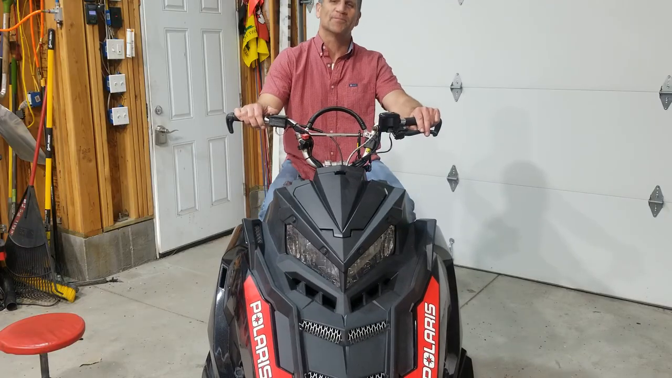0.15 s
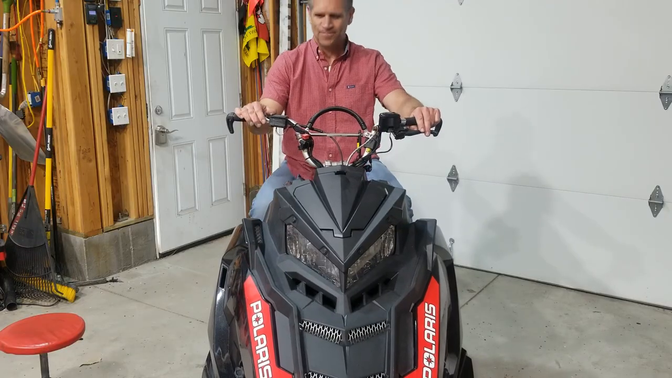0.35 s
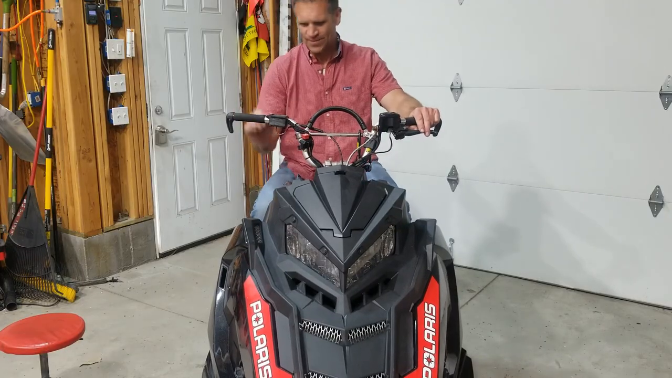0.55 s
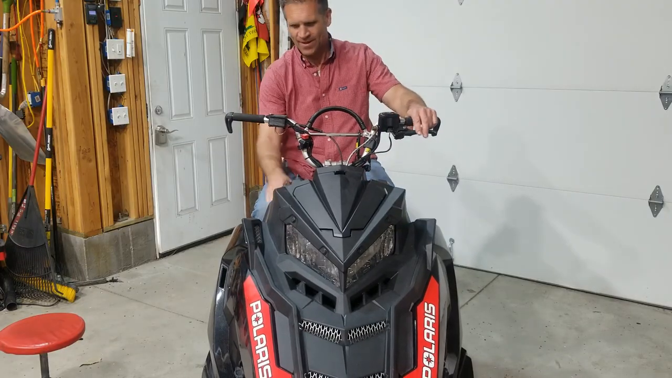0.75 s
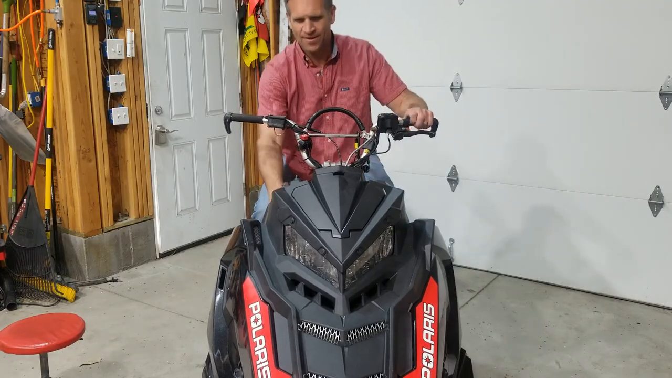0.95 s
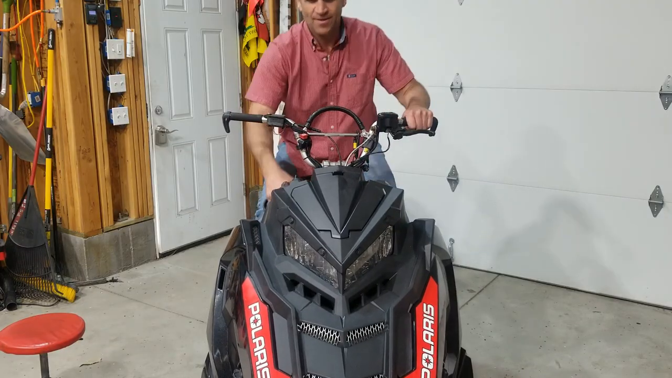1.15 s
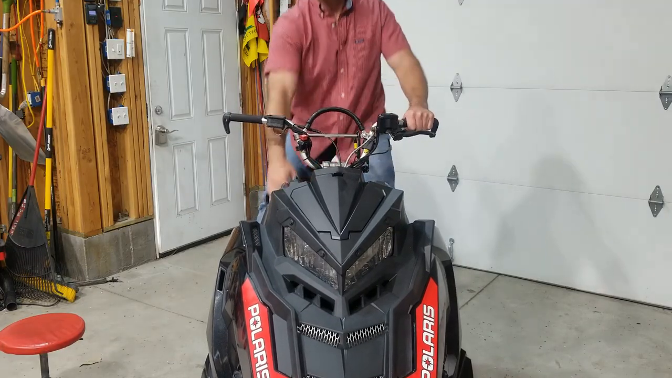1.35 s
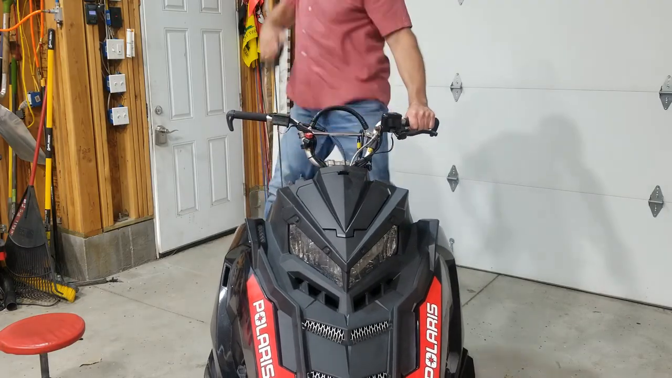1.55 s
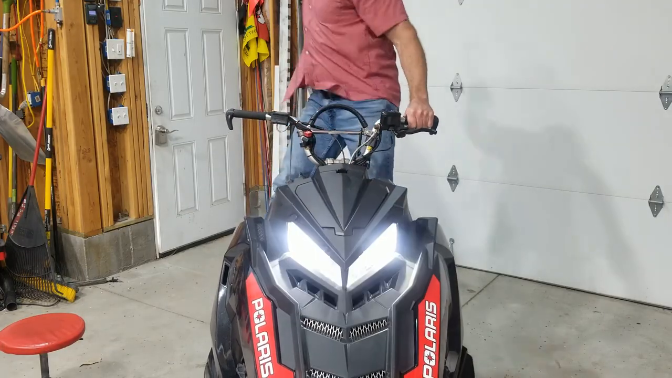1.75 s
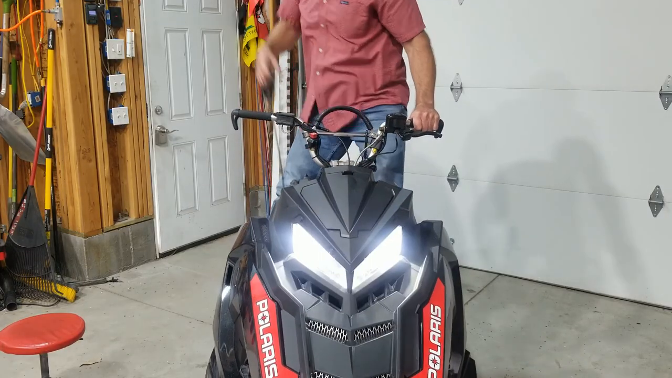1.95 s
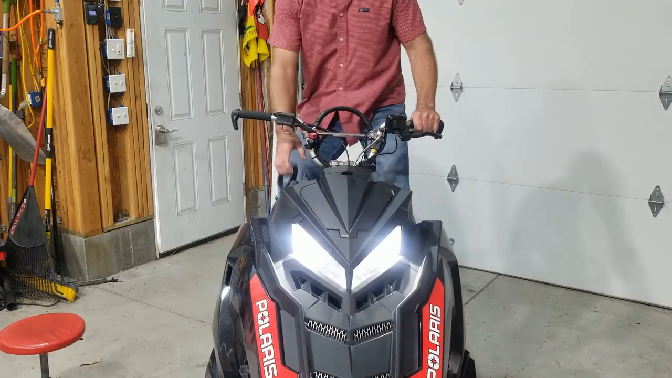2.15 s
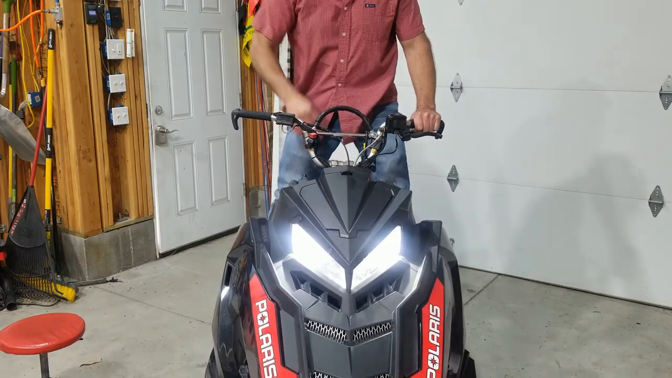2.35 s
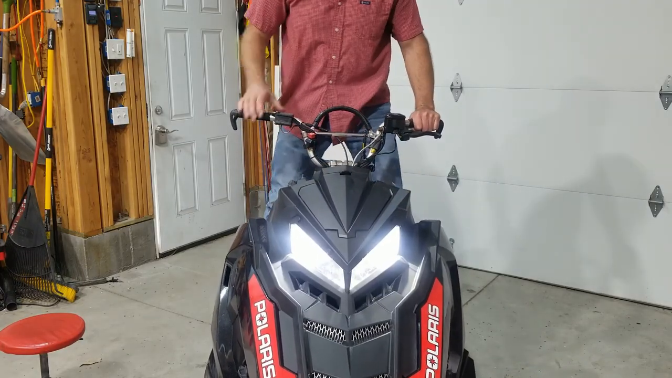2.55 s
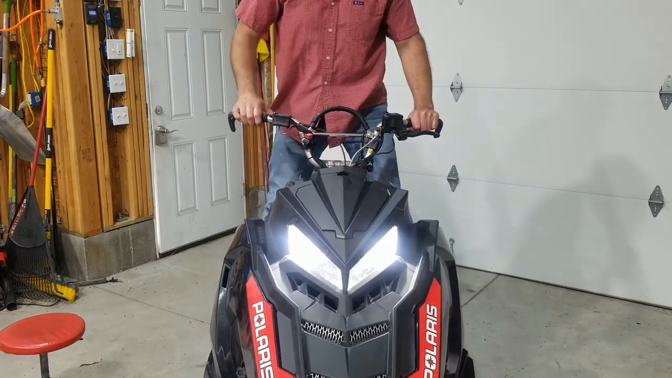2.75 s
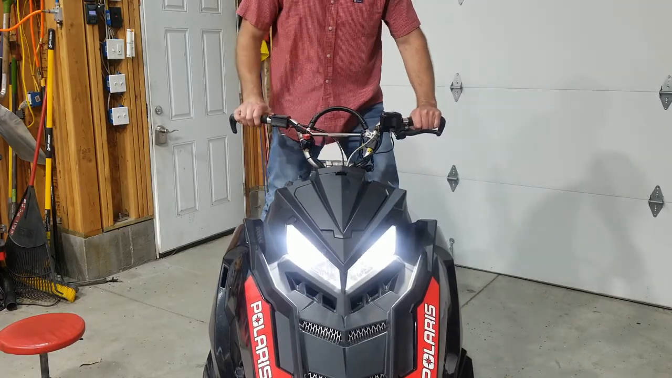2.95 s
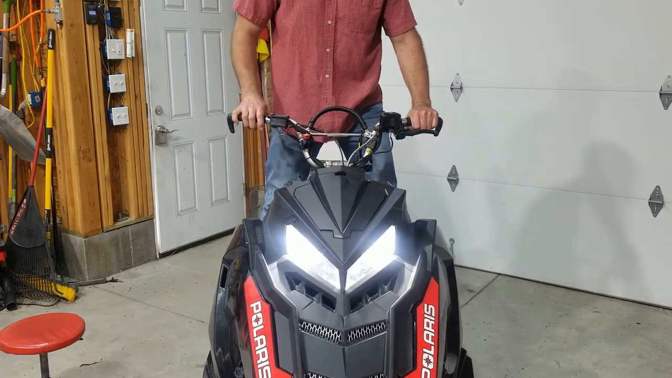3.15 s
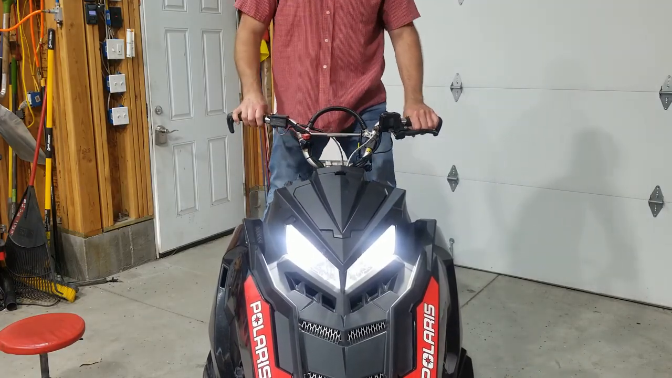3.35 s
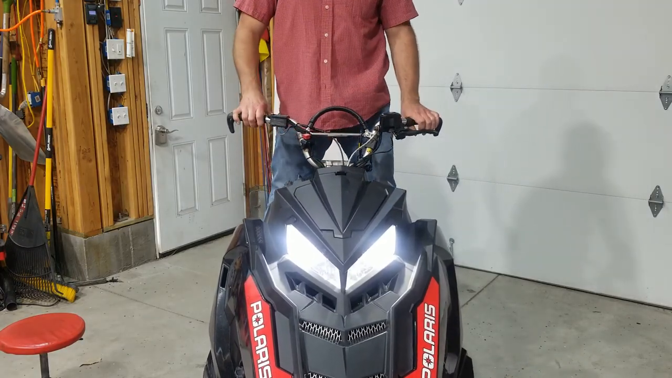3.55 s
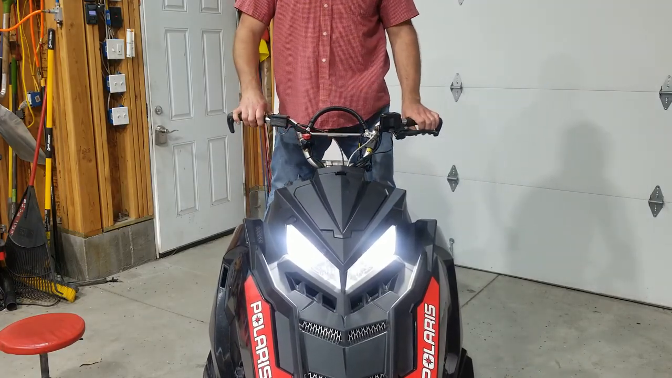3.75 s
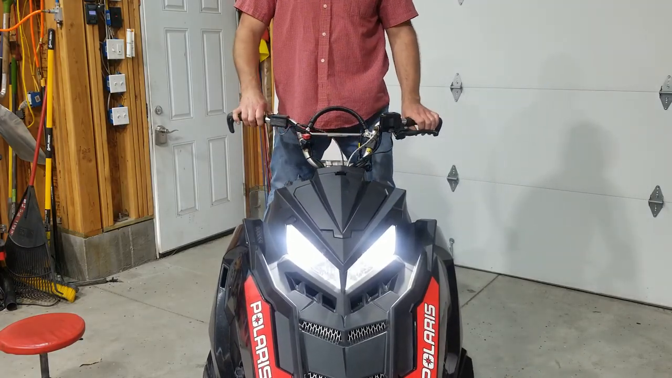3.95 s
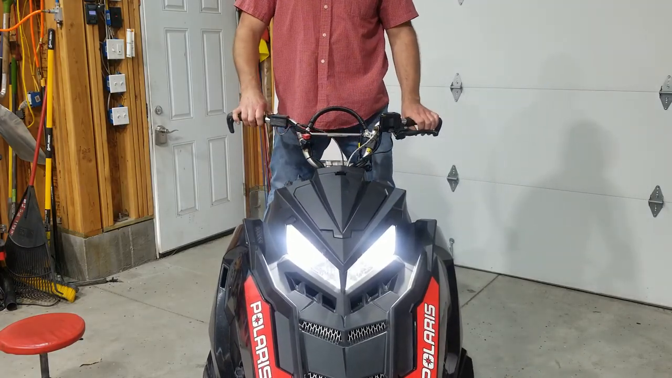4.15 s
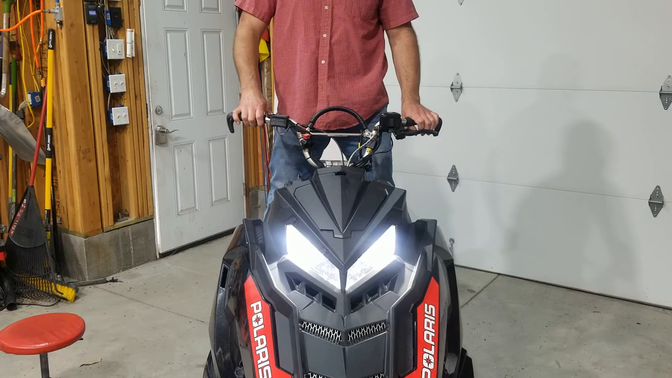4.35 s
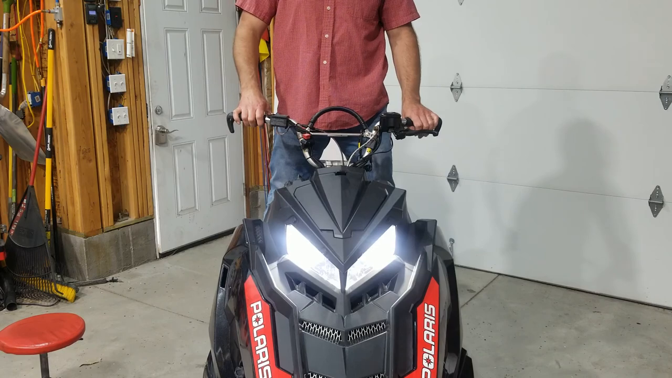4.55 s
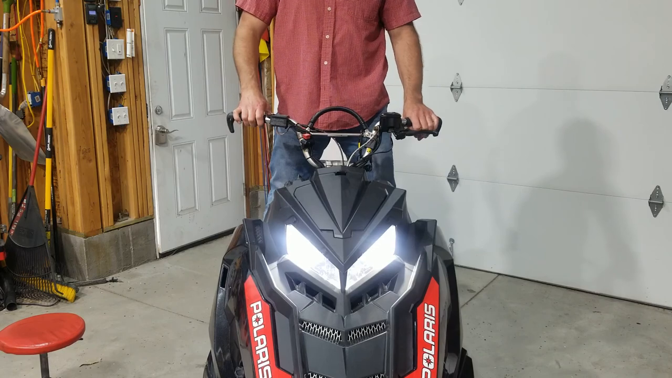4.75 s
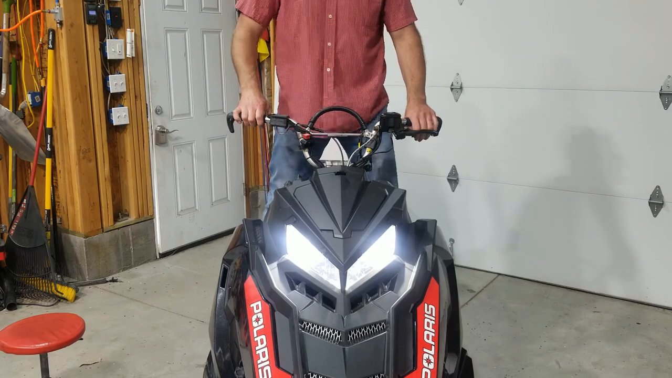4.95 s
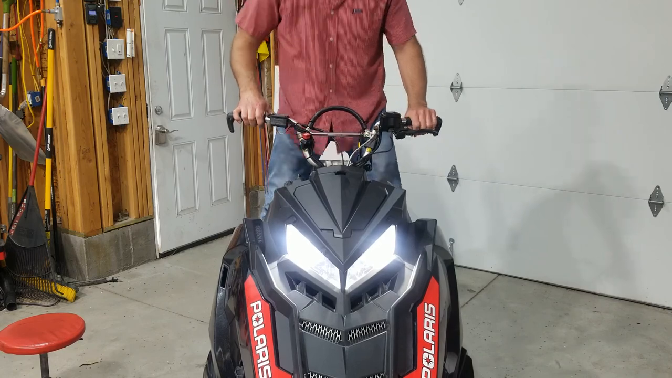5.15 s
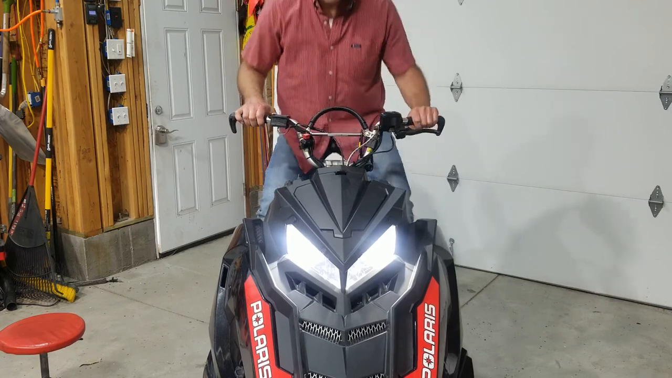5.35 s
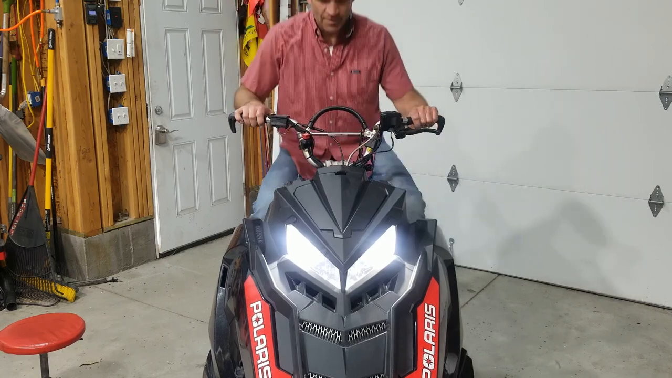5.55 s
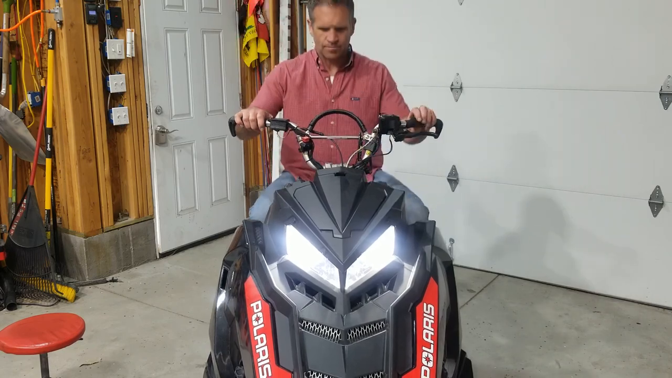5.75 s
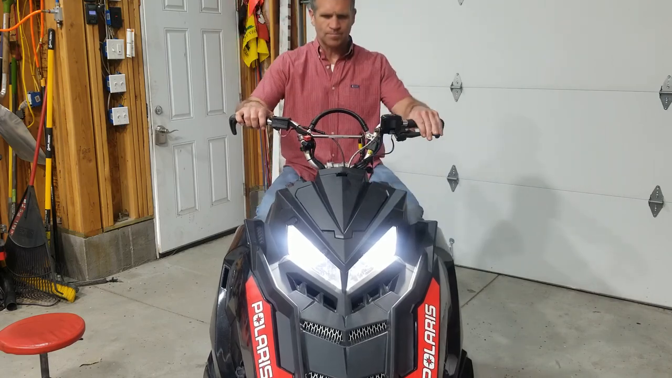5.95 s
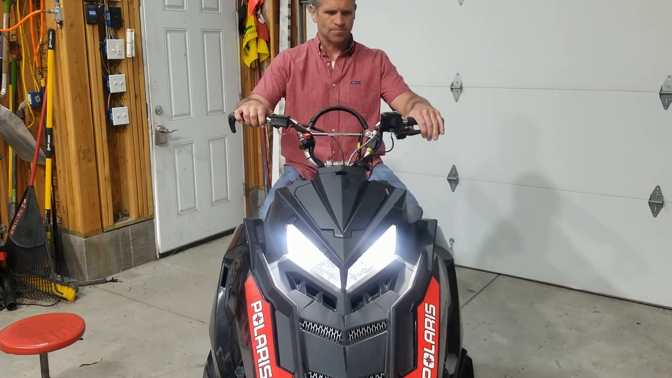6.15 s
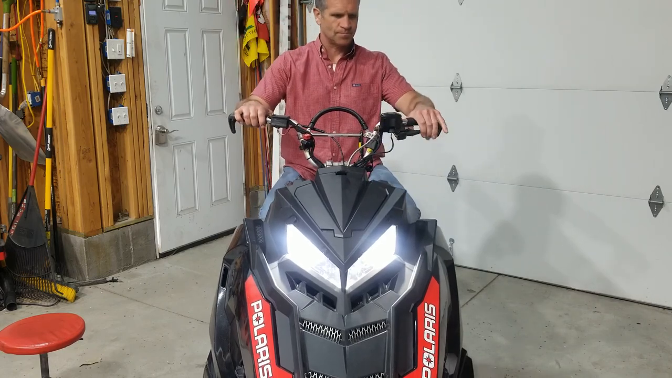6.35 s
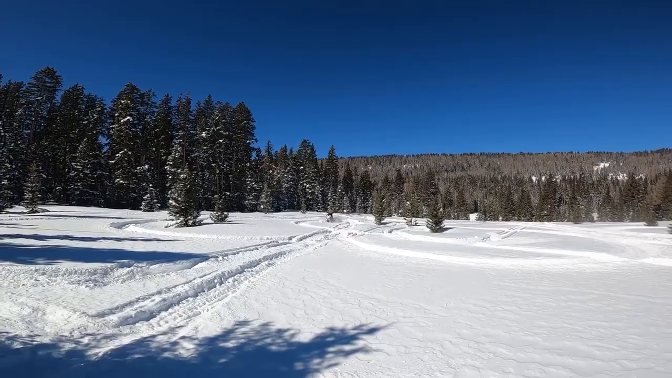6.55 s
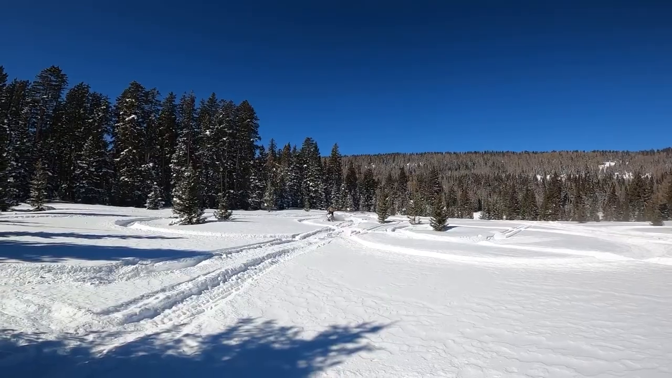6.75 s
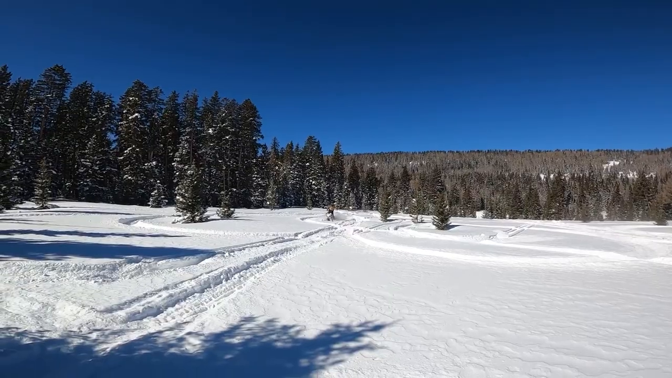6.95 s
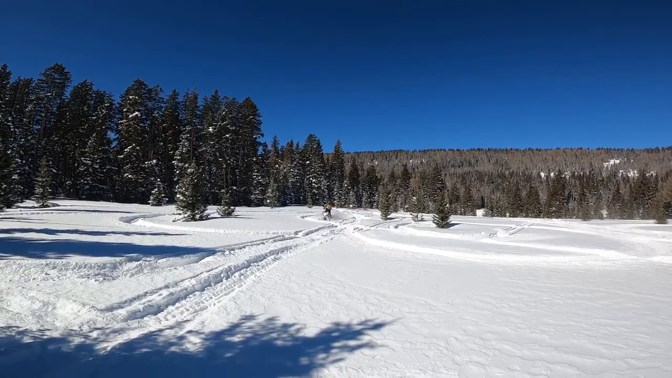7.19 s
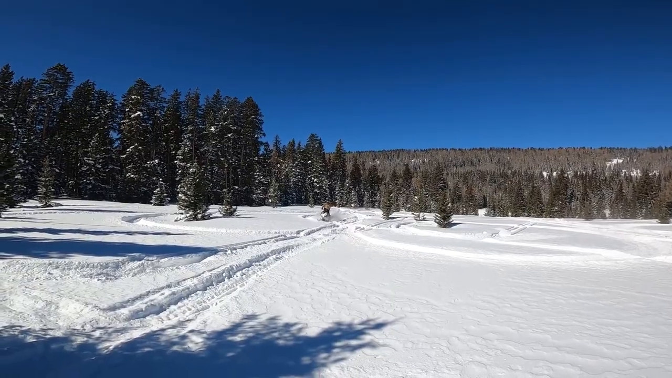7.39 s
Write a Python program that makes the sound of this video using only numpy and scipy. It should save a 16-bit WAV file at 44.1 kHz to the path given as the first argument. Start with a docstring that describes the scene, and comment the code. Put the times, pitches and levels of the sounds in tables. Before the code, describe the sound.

For the first 1.4 seconds, a faint low hum fills a closed garage while a rider shifts on a snowmobile: soft seat thuds, cloth scrapes and hollow knocks on the bodywork, ending in a pull of the starter cord. The two-stroke engine catches with a low thump near 1.5 seconds as the sound fades to brief silence. From about 1.7 seconds it fades back in, growing steadily louder on an uneven, close idle. Each irregular firing rings the exhaust pipe, rattles the panels and puffs hiss, over a deep boom that overloads the microphone. Around 5 seconds the engine briefly surges and fires evenly, then returns to sputtering. At 6.5 seconds it cuts off abruptly, replaced by a much quieter snowmobile at full speed far across an open snowfield, a wavering whine over a rushing roar, lasting until about 7.4 seconds.

```python
"""Closed garage, low hum: a rider shifts on a two-stroke snowmobile, knocks the bodywork, pulls the cord.
The engine catches near 1.5 s, during a fade out. From 1.7 s a long fade in on an uneven idle: each
firing rings the pipe, rattles panels and puffs hiss, most swell the silencer boom, and the bass overloads
the microphone. Near 5 s, a brief surge of even firing. At 6.5 s a hard cut to a snowfield:
a far sled at full speed, wavering crank orders over track and intake roar."""
import sys
import numpy as np
from scipy import signal
from scipy.io import wavfile
from scipy.ndimage import uniform_filter1d

SR = 44100
rng = np.random.default_rng(int(sys.argv[2]) if len(sys.argv) > 2 else 0)


def master_out(mix):
    """Clip the mix to full scale and print it as 16-bit PCM to the path in sys.argv[1]."""
    frames = np.transpose(np.atleast_2d(mix))
    ceiling = np.clip(frames, -1, 1)
    pcm = np.round(ceiling * 32767).astype(np.int16)
    wavfile.write(sys.argv[1], SR, pcm)


N = 327310
T = np.arange(N) / SR

# (frequency [Hz], L/R correlation [-])
GARAGE_COHERENCE = [(60, 0.97), (180, 0.85), (550, 0.63), (1650, 0.23), (4970, -0.16), (15000, 0.018)]
# stereo balance: (frequency [Hz], L-R [dB])
RIDER_BALANCE = [(60, -9), (180, -5), (550, -8), (1650, -8.5), (4970, 0), (15000, 19)]
ENGINE_BALANCE = [(60, -12), (130, -4.5), (290, -7), (640, -7.5), (1410, -5.5), (3100, -1), (6820, 5.5),
                  (15000, 13.5)]
# cloth, cord and exhaust hiss: (frequency [Hz], density [dB])
HISS_SPECTRUM = [(2060, -33), (3500, 5), (4340, 7), (6540, -2.5), (7010, 0.5), (10500, 1.5), (12900, 2),
                 (13500, -0.5), (15800, -8.5)]
# engine audible: (start [s], end [s])
ENGINE_SPANS = [(1.38, 1.69), (1.727, 6.495)]
# (time [s], bang [dB], favoured pipe pitch [Hz], silencer boom [dB]; nan = last swell carries on)
IDLE_FIRINGS = [(1.385, -73, 307, -34), (1.439, -70, 307, -38), (1.468, -47, 307, -19),
                (1.504, -55, 306, -18.5), (1.54, -46.5, 306, -18), (1.594, -36, 300, np.nan),
                (1.721, -58, 251, -15), (1.784, -48.5, 251, -14), (1.86, -38, 263, -13.5),
                (1.919, -35, 267, -19), (2.005, -63, 250, -20), (2.062, -34.5, 250, -17.5),
                (2.12, -33.5, 265, -17), (2.223, -35, 342, -18.5), (2.348, -37, 220, -15.5),
                (2.443, -40, 258, -26), (2.497, -55, 254, -19.5), (2.542, -36.5, 263, -15.5),
                (2.598, -34.5, 319, -15), (2.692, -46, 263, -18.5), (2.775, -63, 260, -19),
                (2.812, -36.5, 258, -18.5), (2.86, -37, 264, np.nan), (2.885, -35.5, 222, -16.5),
                (3.025, -39.5, 260, -25.5), (3.113, -36, 270, -21), (3.204, -38.5, 249, -29),
                (3.271, -56.5, 244, -20), (3.308, -36, 250, -17.5), (3.377, -46, 254, -18.5),
                (3.415, -36, 262, np.nan), (3.507, -34.5, 280, -20), (3.609, -37, 267, -22.5),
                (3.658, -37.5, 277, -16), (3.748, -48, 341, -19), (3.798, -40, 338, -22.5),
                (3.856, -35.5, 251, -18), (3.952, -36, 262, -14), (4.014, -35, 275, -19),
                (4.094, -54, 320, -16.5), (4.118, -41, 316, np.nan), (4.18, -53.5, 316, -17),
                (4.226, -53.5, 316, -15), (4.273, -34, 358, -17), (4.402, -64, 264, -21),
                (4.431, -36.5, 264.8, -15), (4.485, -34, 272, -16), (4.618, -38.5, 250, -15),
                (4.672, -35.5, 263, -16.5), (4.771, -38.5, 258, -19.5), (4.829, -54.5, 231, -22),
                (4.871, -34, 232, -17), (4.891, -33.5, 274, np.nan), (4.921, -32.5, 311, -17.5),
                (4.948, -37.5, 300, -28.5), (5.099, -40, 209, -25), (5.14, -40, 214, -20.5),
                (5.201, -50, 211.9, -18.5), (5.256, -37.5, 262.4, -19), (5.295, -56, 252, -17.5),
                (5.373, -42, 263, np.nan), (5.462, -41.5, 305, -15.5), (5.558, -46, 225, -14),
                (5.601, -40, 256, -17), (5.661, -35.5, 297, -19.5), (5.786, -42, 260.8, -26),
                (5.836, -37.5, 207.8, -19), (5.936, -39, 222, -19.5), (6.018, -63, 306.3, -20),
                (6.115, -36, 309, -21.5), (6.144, -38, 315, -18), (6.258, -63, 319, -17),
                (6.33, -36.5, 306, -22), (6.358, -38, 309.2, -19), (6.52, -56, 317, -27)]
# steady noise under the firings: (time [s], rumble [dB], rattle [dB], hiss [dB])
ENGINE_FLOOR = [(1.38, -76, -42, -73), (1.46, -40, -30.5, -71), (1.5, -39, -31, -65), (1.69, -20, -18, -26),
                (1.73, -15, -23.5, -37), (2.04, -23, -29, -53), (2.2, -23, -28, -49), (4.8, -22, -29, -49),
                (5.0, -20.5, -24.5, -44), (5.7, -25, -29, -48.5), (6.5, -24.5, -29.5, -51.5)]

FULL_BANG_DB = -36
RING_DB, RING_SLOPE = -20.5, 0.55  # pipe and rumble drive at a full bang; dB per dB of bang


def gain_of(db):
    return 10 ** (np.asarray(db) / 20)


def unit_rms(x):
    return x / np.sqrt(np.mean(x ** 2) + 1e-20)


def at_hz(points, hz):
    f, value = np.transpose(points)
    return np.interp(np.log(hz + 1), np.log(f + 1), value)


def level(rows, column=1):
    """Gain along a dB curve, silent outside it."""
    rows = np.array(rows, float)
    return gain_of(np.interp(T, rows[:, 0], rows[:, column], left=-150, right=-150))


def add(mix, start_s, sound):
    part = mix[..., round(start_s * SR):][..., :sound.shape[-1]]
    part += sound[..., :part.shape[-1]]


def noise(spectrum, balance, patch_db, size=1024, coherence=GARAGE_COHERENCE):
    """Coloured stereo noise with drifting spectral patches; mid at unit RMS."""
    frames, hz = N // (size // 4) + 5, np.fft.rfftfreq(size, 1 / SR)
    a, b, c, d, patches = rng.standard_normal((frames, len(hz), 5)).T
    patches = unit_rms(uniform_filter1d(uniform_filter1d(patches, size=8, axis=0), size=8, axis=1))
    shared = np.clip(at_hz(coherence, hz), -1, 1)[:, None]
    left = a + 1j * b
    bins = np.array([left, shared * left + np.sqrt(1 - shared ** 2) * (c + 1j * d)])
    pan_db = np.outer([.5, -.5], at_hz(balance, hz))[..., None]
    bins *= gain_of(at_hz(spectrum, hz)[:, None] + patch_db * patches + pan_db)
    out = signal.istft(bins, nperseg=size, noverlap=size * 3 // 4)[1][:, :N]
    return out / np.sqrt(np.mean(out.mean(0) ** 2))


def ring(hz, db, t60_s, rise_s):
    """Decaying mode, soft onset, small L/R phase offset."""
    t = np.arange(round(SR * t60_s)) / SR
    start, shift = rng.random(2)
    phase = 2 * np.pi * (hz * t + start + np.array([[0], [0.064 * (shift - .5)]]))
    return gain_of(db - 60 * t / t60_s) * (1 - np.exp(-t / rise_s)) * np.sin(phase)


def firing_db(full_db, slope):
    """Level per firing: full_db at a full bang, slope in dB per dB."""
    return full_db + slope * (np.transpose(IDLE_FIRINGS)[1] - FULL_BANG_DB)


def bursts(db, rise_s, t60_s, floor=0):
    """Envelope: each firing adds power that dies in the room."""
    kicks = np.zeros(N)
    kicks[np.round(np.transpose(IDLE_FIRINGS)[0] * SR).astype(int)] = gain_of(2 * db)
    t = np.arange(SR // 2) / SR
    power = signal.oaconvolve(kicks, (1 - np.exp(-t / rise_s)) * gain_of(-120 * t / t60_s))[:N]
    return np.sqrt(abs(power) + floor ** 2)


def strokes(rows, column, rise_db_s, fall_db_s):
    """Envelope: a rise and fall around each peak; the loudest wins."""
    db = [row[column] - np.where(T < row[0], rise_db_s, fall_db_s) * abs(T - row[0]) for row in rows]
    return gain_of(np.max(db, axis=0))


def garage_air(hum_hz=92, width_hz=5):
    """Still air and a narrow low hum."""
    # (time [s], level [dB])
    hum_curve = [(0.0, -33), (.2, -46.5), (.652, -40), (1.088, -39.5), (1.178, -55), (1.33, -60)]
    # (frequency [Hz], density [dB])
    air_spectrum = [(12, -25), (25, -15), (90, 11.5), (200, 10), (300, 3), (420, -12.5), (1500, -18),
                    (4000, -31), (8000, -52), (13000, -34), (15800, -39)]
    band_hz = [hum_hz - width_hz / 2, hum_hz + width_hz / 2]
    bandpass = signal.butter(1, band_hz, "band", fs=SR, output="sos")
    hum = unit_rms(signal.sosfilt(bandpass, rng.standard_normal(N)))
    air = gain_of(-42.5) * noise(air_spectrum, RIDER_BALANCE, patch_db=5.1, size=2048)
    return air * (T < ENGINE_SPANS[0][1]) + level(hum_curve) * hum * gain_of([[-4], [3]])


def rider(bright_db=-30.5, dull_hz=3300):
    """Shifts and tugs: seat thuds, scrapes, hiss of cloth and cord, all rubbing unevenly."""
    # (peak time [s], thud [dB], scrape [dB])
    shifts = [(0.0, -43, -44), (0.058, -29.5, -31), (0.141, -30, -36), (0.281, -43, -40), (.335, -41, -40),
              (0.402, -32.5, -39), (.465, -37, -45.5), (.59, -52, -56), (.763, -48, -53), (.845, -41, -59),
              (.86, -33.5, -52), (.9, -42, -46.5), (1.021, -31.5, -38.5), (1.066, -44, -31),
              (1.105, -44, -23.5), (1.168, -40, -29.5), (1.215, -41, -36), (1.35, -58, -42.5),
              (1.385, -40, -38), (1.405, -42, -32.5), (1.48, -50, -33.5), (1.53, -48, -45), (1.6, -37, -41),
              (2.222, -40, -29), (2.236, -39, -18.5)]
    # (frequency [Hz], density [dB])
    thud_spectrum = [(65, -67), (110, 2), (161, -0.5), (254, -1.5), (384, -4.5), (471, -19), (600, -12),
                     (780, -45), (1320, -120)]
    scrape_spectrum = [(210, -13.5), (350, -1), (471, -30), (605, 26), (723, -17), (985, -3), (1490, -11.5),
                       (1920, -12.5), (6000, -32.5), (7800, -66), (13200, -120)]
    # (time [s], level [dB])
    cord_curve = [(0.0, -58.5), (.238, -64), (.75, -72), (1.0, -64), (1.092, -56), (1.101, -45),
                  (1.108, -39.5), (1.125, -44), (1.176, -50.5), (1.262, -64), (1.474, -57.5), (1.592, -57),
                  (1.62, -49)]
    grain = unit_rms(gain_of(unit_rms(uniform_filter1d(rng.standard_normal(N), size=300))))
    scrape = noise(scrape_spectrum, RIDER_BALANCE, patch_db=1.6, size=256)
    thud = noise(thud_spectrum, RIDER_BALANCE, patch_db=1.6, size=512)
    thud *= strokes(shifts, 1, rise_db_s=604, fall_db_s=122)
    force = strokes(shifts, 2, rise_db_s=1800, fall_db_s=113)
    dull = signal.oaconvolve(scrape, signal.firwin(63, dull_hz, fs=SR)[None], "same")
    brightness = np.sqrt(np.minimum(force / gain_of(bright_db), 1))  # soft scrapes lose treble
    cord = level(cord_curve) * noise(HISS_SPECTRUM, RIDER_BALANCE, patch_db=0.83, size=256)
    return grain * (thud + force * (dull + brightness * (scrape - dull)) + cord)


def body_knocks(falloff_db_oct=57):
    """Knocks ring the bodywork modes nearest the struck spot's pitch."""
    # (time [s], level [dB], spot pitch [Hz])
    knocks = [(.053, -25, 1720), (0.067, -19, 250), (0.091, -19, 133), (0.151, -31, 133), (.338, -40, 825),
              (.4, -28.5, 250), (.462, -29.5, 250), (.762, -45, 950), (.835, -25, 250), (0.867, -24.5, 255),
              (1.029, -26.5, 250), (1.066, -33, 1180), (1.106, -21.5, 935), (1.107, -41, 9000),
              (1.168, -27, 1920), (1.403, -28, 786), (1.428, -20.5, 426), (1.455, -17.5, 570)]
    # (frequency [Hz], t60 [s])
    body_modes = [(133, 0.17), (250, 0.15), (426, .2), (610, 0.12), (810, 0.15), (930, 0.061),
                  (1180, 0.037), (1920, .045), (9000, 0.017)]
    out = np.zeros((2, N))
    for start_s, db, spot_hz in knocks:
        for hz, t60_s in body_modes:
            mode = ring(hz, db - falloff_db_oct * abs(np.log2(hz / spot_hz)), t60_s, rise_s=.4 / hz)
            add(out, start_s, mode * gain_of(at_hz(RIDER_BALANCE, hz) * np.array([[.5], [-.5]])))
    return out


def rumble():
    """Low noise, puffed by each firing."""
    # (frequency [Hz], density [dB])
    spectrum = [(11, -55), (25, -68), (60, -13.5), (95, -1.5), (135, -5.5), (190, -19), (260, -8),
                (430, -17), (550, -60), (900, -88)]
    puffs = bursts(firing_db(RING_DB, RING_SLOPE), rise_s=.012, t60_s=.22, floor=level(ENGINE_FLOOR))
    return gain_of(-4) * puffs * noise(spectrum, ENGINE_BALANCE, patch_db=2.5, size=2048)


def panel_rattle():
    """Each bang: a short crack, then shaking panels."""
    # (frequency [Hz], density [dB])
    spectrum = [(220, -11), (380, -3), (661, -10), (1160, -12), (1610, -16.5), (2100, -20.5), (2670, -24.5),
                (4290, -32), (6000, -40), (7800, -51), (13200, -120)]
    shake = bursts(firing_db(-23.5, 0.67), rise_s=.007, t60_s=.32, floor=level(ENGINE_FLOOR, column=2))
    crack = bursts(firing_db(-38, 1), rise_s=.002, t60_s=0.041)
    return np.hypot(shake, crack) * noise(spectrum, ENGINE_BALANCE, patch_db=0.6, size=256)


def exhaust_hiss():
    """A puff of hiss in proportion to each bang."""
    floor = level(ENGINE_FLOOR, column=3)
    puffs = bursts(firing_db(FULL_BANG_DB, 1), rise_s=0.014, t60_s=0.26, floor=floor)
    return puffs * noise(HISS_SPECTRUM, ENGINE_BALANCE, patch_db=2.3, size=256)


def pipe_ring():
    """Each firing rings the exhaust modes, driving those near its favoured pitch hardest."""
    # (frequency [Hz], level [dB], t60 [s])
    pipe_modes = [(210.9, 6, 0.37), (229.3, 13, 0.14), (263.6, 3, 0.33), (270, -7, 0.064), (306.6, 3, 0.25),
                  (336.4, -2, 0.52), (395.5, -0.5, 0.26), (465, -39, 0.53)]
    out = np.zeros((2, N))
    for (start_s, _, favoured_hz, _), db in zip(IDLE_FIRINGS, firing_db(RING_DB, RING_SLOPE)):
        for hz, mode_db, t60_s in pipe_modes:
            detune_db = min(80 * abs(np.log2(hz / favoured_hz)), 10.5)
            add(out, start_s, ring(hz, db + mode_db - detune_db, t60_s, rise_s=0.014))
    return out * gain_of([[-3], [1.5]])


def silencer_boom(choke_lag_s=.014, lift_share=0.1646, lift_decay_s=0.1045, sag_share=.07):
    """The silencer swells after a firing and sags in pitch; the next chokes it and knocks its phase."""
    # (time [s], base pitch [Hz])
    pitch_curve = [(1.4, 104.3), (1.75, 108), (2.6, 109.3), (3.3, 107.2), (4.2, 107.2), (4.8, 108.8),
                   (5.1, 120.6), (5.35, 120.7), (5.7, 111.5), (6.5, 110.2)]
    fired_s, bang_db, _, boom_db = np.transpose(IDLE_FIRINGS)
    kick_s = fired_s + choke_lag_s
    swells = ~np.isnan(boom_db)
    start_s, boom_db = kick_s[swells], boom_db[swells]
    k = np.clip(np.searchsorted(start_s, T) - 1, 0, len(start_s) - 2)  # current swell
    progress = np.clip((T - start_s[k]) / (start_s[k + 1] - start_s[k]), 0, 1)
    arch = .08 + .92 * np.sin(np.pi * progress ** .8) ** 1.4
    swell = np.sqrt(2) * gain_of(uniform_filter1d(boom_db[k], size=400)) * arch
    knock_rad = uniform_filter1d(np.cumsum(rng.choice([-1.5, 1.5], len(start_s)))[k], size=300)
    kicks = np.zeros(N)
    kicks[np.round(kick_s * SR).astype(int)] = np.minimum(gain_of(bang_db - FULL_BANG_DB), 1)
    lift = lift_share * signal.lfilter([1], [1, -np.exp(-1 / (lift_decay_s * SR))], kicks)
    lift -= uniform_filter1d(lift, size=SR // 2)  # mean pitch stays put
    hz = np.interp(T, *np.transpose(pitch_curve)) * (1 + lift + sag_share * (.5 - progress))
    phase = 2 * np.pi * np.cumsum(hz) / SR + knock_rad + np.array([[.15], [0]])
    wave = np.sin(phase) + gain_of(-18.5) * np.cos(2 * phase) + gain_of(-17.5) * np.sin(3 * phase)
    return swell * wave * gain_of([[-5.5], [2.5]])


def surge():
    """While every stroke fires, clean orders of the firing rate stand out."""
    # (time [s], firing rate [Hz], third order [dB], fourth order [dB])
    curve = [(4.88, 71, -55, -49), (4.93, 73.55, -27, -32), (4.97, 76.83, -25.5, -24),
             (5.03, 75.85, -27, -19), (5.07, 72.04, -24, -33), (5.12, 70.25, -22, -26.5),
             (5.19, 69.5, -32, -37), (5.25, 69.4, -41, -29)]
    # (order [-], level re third order [dB])
    orders = [(1, -15), (2, -9), (5, -28), (6, -15.5)]
    phase = 2 * np.pi * np.cumsum(np.interp(T, *np.transpose(curve)[:2])) / SR
    tone = np.cos(3 * phase) + sum(gain_of(db) * np.cos(order * phase) for order, db in orders)
    out = level(curve, column=2) * tone + level(curve, column=3) * np.cos(4 * phase)
    return np.sqrt(2) * out * gain_of([[-2.5], [2]])


def engine(bass_boost_db=8):
    """The near two-stroke: boosted bass, rattle and hiss, with a low thump as it catches."""
    bass = silencer_boom() + pipe_ring() + surge() + rumble()
    treble = panel_rattle() + exhaust_hiss()
    add(bass, start_s=1.478, sound=ring(hz=68.5, db=-23, t60_s=.12, rise_s=.006))
    running = sum((T > start_s) & (T < end_s) for start_s, end_s in ENGINE_SPANS)
    return running * (gain_of(bass_boost_db) * bass + treble)


def far_sled():
    """Crank orders waver in moving air, over track and intake roar puffed at the firing rate."""
    # (time [s], firing rate [Hz])
    rate_curve = [(6.5, 197.8), (6.57, 201.7), (6.65, 203.8), (6.74, 203), (6.84, 200.6), (6.92, 197.9),
                  (7.0, 198.1), (7.2, 197.6), (7.42, 197)]
    # (multiple of crank speed [-])
    orders = (3, 4, 5, 6, 7, 8, 10, 12, 14, 16, 17, 18, 19, 20, 22, 24, 26, 28, 30)
    # (relative level per order [dB])
    orders_db = (-19, 0, -18, -5, -20, -20, -12, -11, -5, -6, -15, -5, -16, -7, -12, -15, -19, -21, -22)
    # (time [s], crank-speed drone [dB], firing tone [dB])
    drone_curve = [(6.5, -55, -58), (6.72, -56.5, -43.5), (6.92, -48.5, -44), (7.02, -44, -46),
                   (7.15, -43, -81), (7.42, -43, -52)]
    # (frequency [Hz], density [dB])
    roar_spectrum = [(20, -21), (100, -14.5), (330, -20), (500, -17), (700, -21.5), (980, -11), (1270, -19),
                     (1700, -9), (2200, -17.5), (3000, -17), (3600, -30.5), (4100, -24.5), (4750, -31.5),
                     (8100, -41), (12000, -54), (15000, -68)]
    # (frequency [Hz], L/R correlation [-])
    field_coherence = [(60, 1.0), (240, 0.96), (950, 0.57), (3770, 0.67), (15000, 0.057)]
    # (frequency [Hz], L-R [dB])
    field_balance = [(60, -0.18), (240, 0.38), (950, 2.3), (3770, -0.63), (15000, 2.6)]
    crank_rad = np.pi * np.cumsum(np.interp(T, *np.transpose(rate_curve))) / SR  # two firings a turn
    tone = np.zeros(N)
    for order, db in zip(orders, orders_db):
        waver = np.interp(T, np.linspace(0, T[-1], num=50), rng.standard_normal(50))
        tone += gain_of(db + 1.2 * waver) * np.cos(order * crank_rad + .22 * waver)
    firing = np.cos(2 * crank_rad)
    roar = noise(roar_spectrum, field_balance, patch_db=1.65, coherence=field_coherence)
    sled = gain_of(-2.5) * unit_rms(tone) + gain_of(-5) * roar * (1 + 0.033 * firing)
    drone = level(drone_curve) * np.cos(crank_rad) + level(drone_curve, column=2) * firing
    return (T > ENGINE_SPANS[1][1]) * gain_of(-32) * sled + np.sqrt(2) * drone


def scene():
    return rider() + body_knocks() + garage_air() + engine() + far_sled()


def record(dry):
    """Microphone overload flattens the bass, treble rides through; then fader and band limit."""
    # (time [s], gain [-])
    fader = [(1.41, 1), (1.667, 0), (1.695, 0), (6.488, 1), (6.493, .1), (6.499, .02), (6.503, 1)]
    ceiling, split_hz, highpass_hz, edge_hz = 0.3, 1800, 12, 15780
    bass = signal.oaconvolve(dry, signal.firwin(255, split_hz, fs=SR)[None], "same")
    flat = bass / (1 + abs(bass / ceiling) ** 8) ** (1 / 8)
    flat = signal.sosfilt(signal.butter(1, highpass_hz, "high", fs=SR, output="sos"), flat)
    faded = (flat + dry - bass) * np.interp(T, *np.transpose(fader))
    band_limit = signal.firwin(1023, edge_hz, window=("kaiser", 9), fs=SR)
    return signal.oaconvolve(faded, band_limit[None], "same")


dry = scene()
out = record(dry)
master_out(out)
```